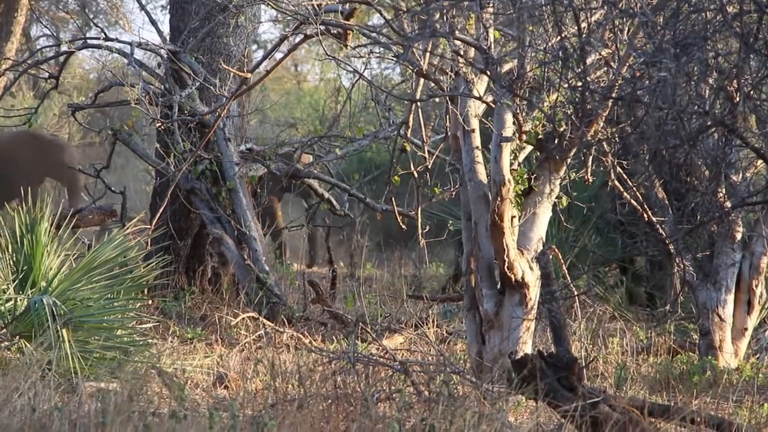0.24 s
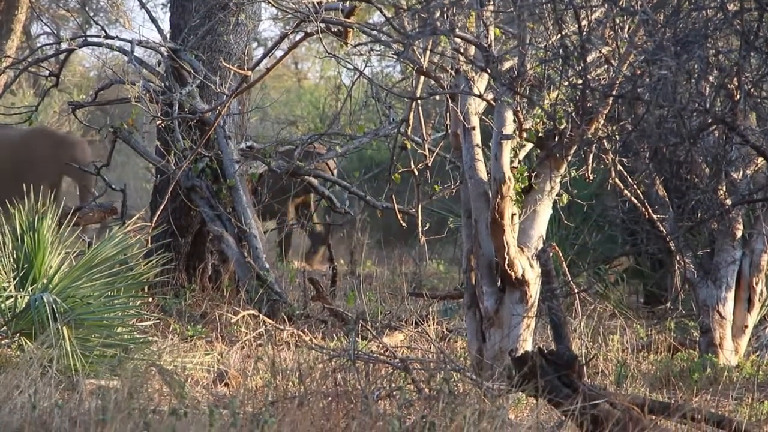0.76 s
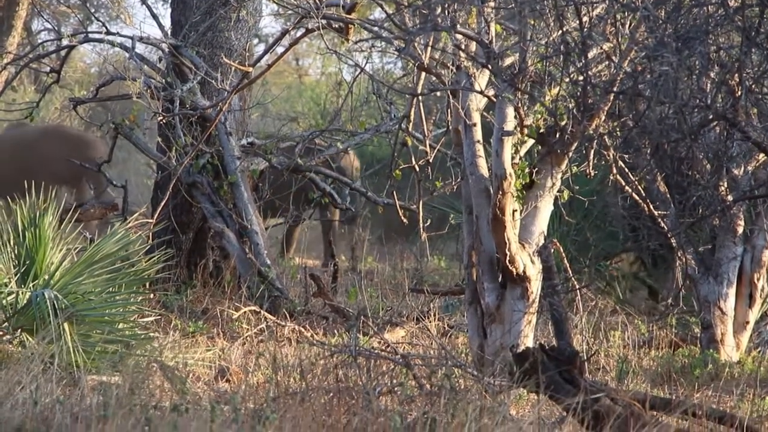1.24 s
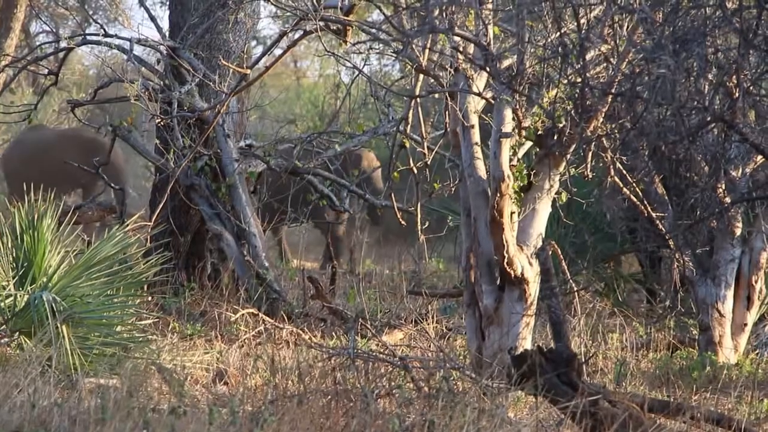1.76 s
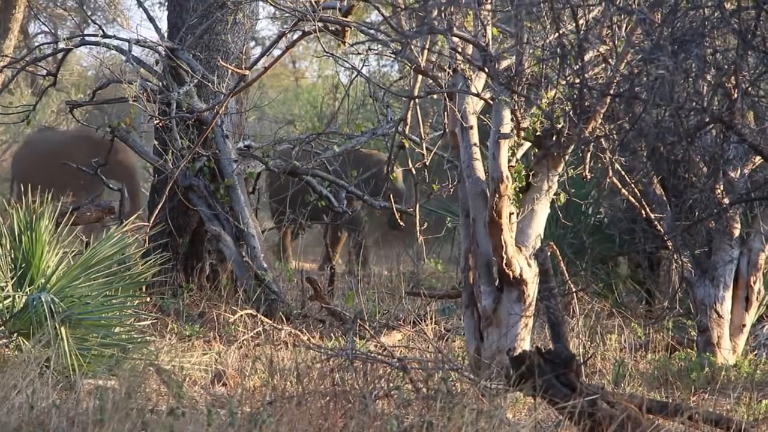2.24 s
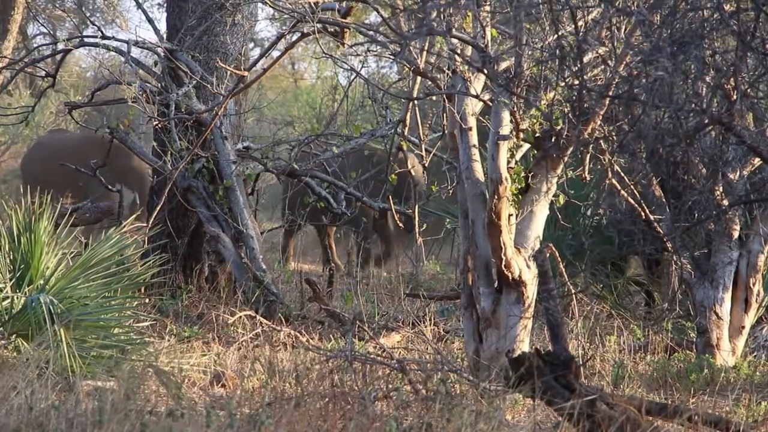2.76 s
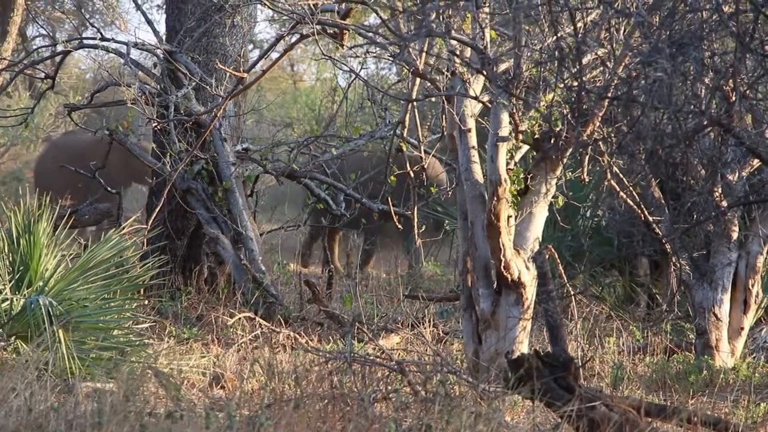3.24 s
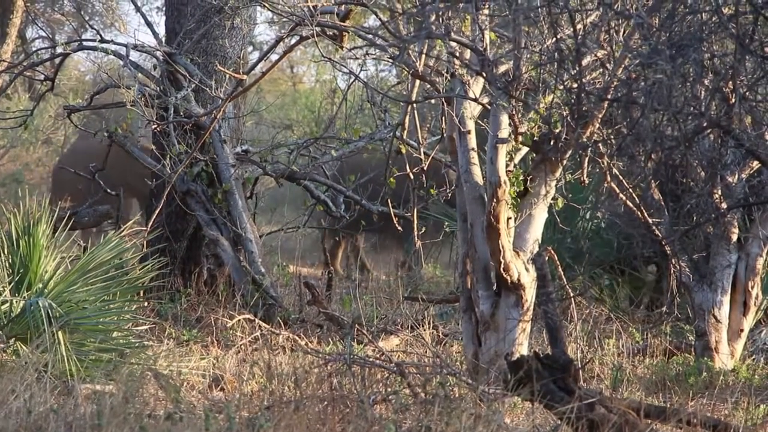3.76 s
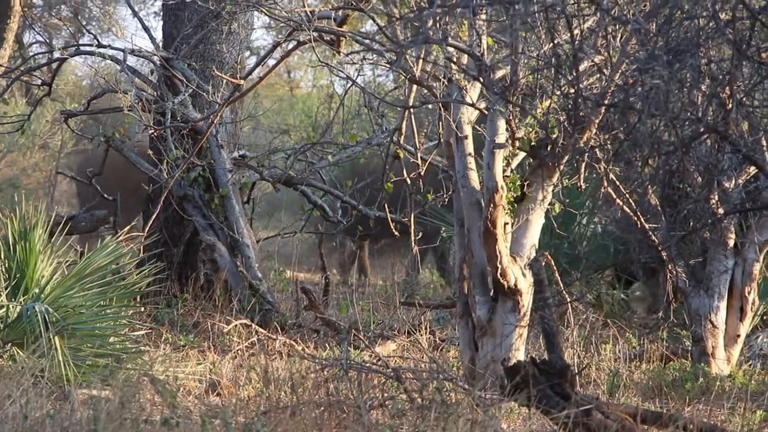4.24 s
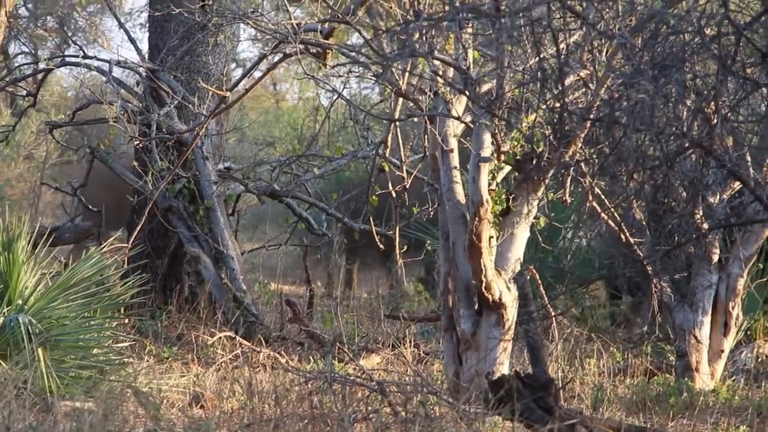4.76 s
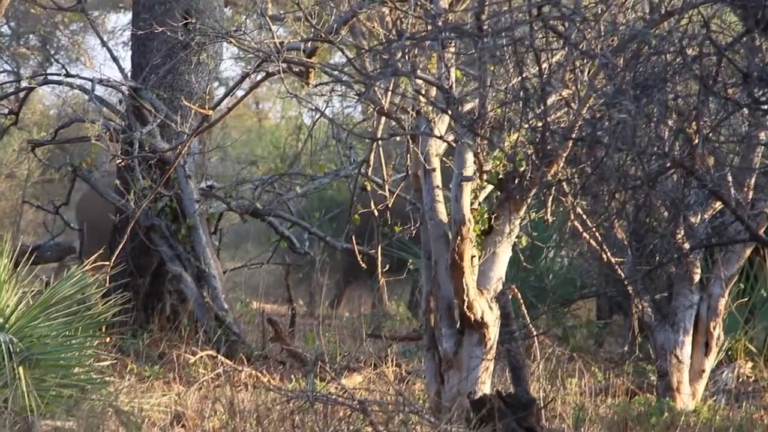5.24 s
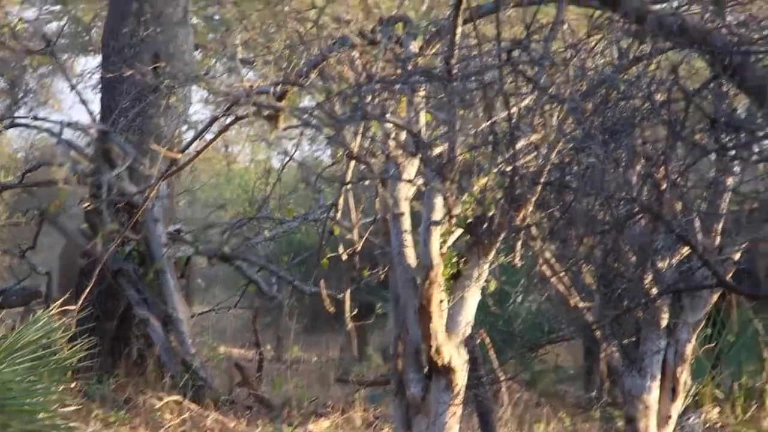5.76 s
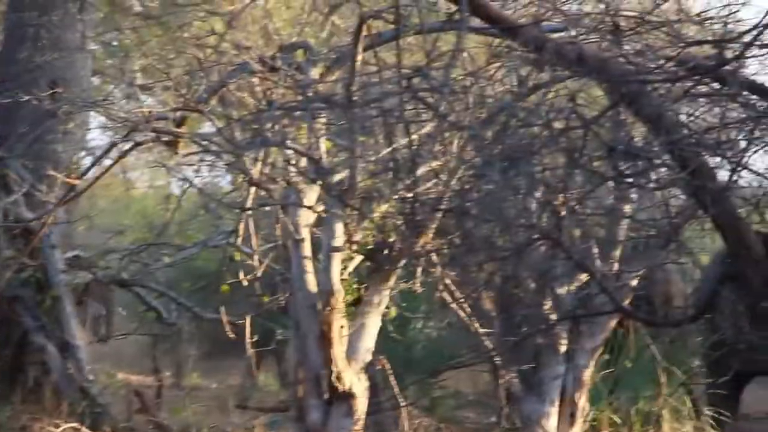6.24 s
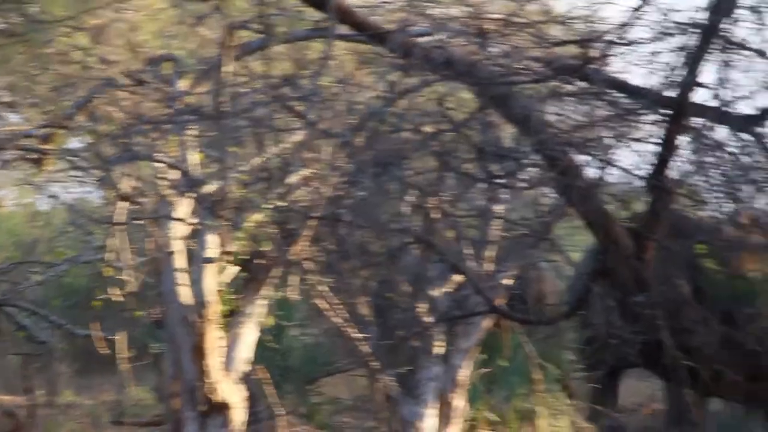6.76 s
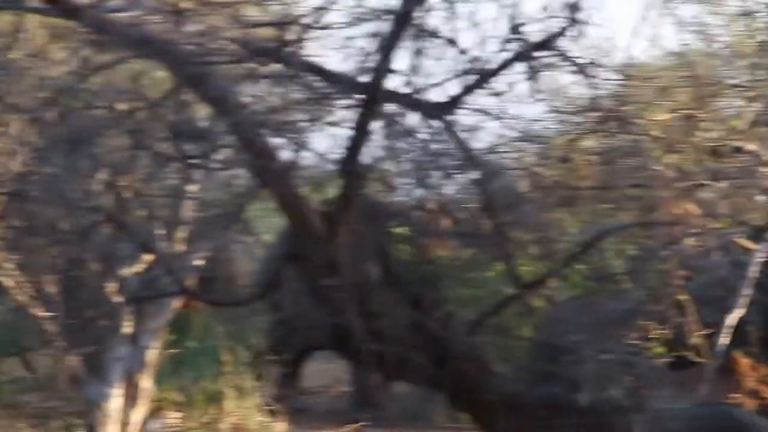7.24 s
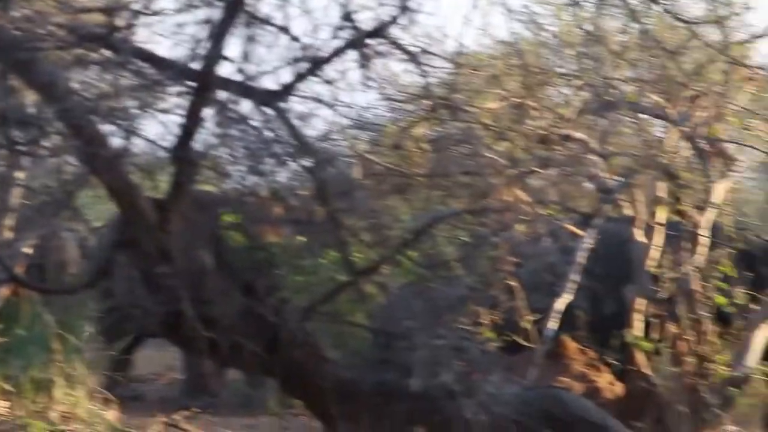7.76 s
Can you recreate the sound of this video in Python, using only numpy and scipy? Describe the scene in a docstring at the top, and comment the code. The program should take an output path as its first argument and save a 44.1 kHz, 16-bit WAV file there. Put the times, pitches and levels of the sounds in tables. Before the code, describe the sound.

A quiet outdoor bush scene, with low air, dry leaf rustle and a high, steady insect hiss. A near insect trills until about 1 second, then gives short buzzing chirps roughly every 0.4 seconds. Thin, high falling bird whistles come near 0.8, 2.8, 4.8 and 6.7. A branch swishes softly around 1.2, and a small crunch of wood breaks at 2.4. A far engine rises from about 2 seconds, swells again near 6.2, then drops away. Wood tears and cracks in a tight cluster at 3.6 to 3.7, snaps again at 4.1 with a swish, then at 5.1 and 5.4, where a short low bird note follows. Dull thuds land around 4.7 and 6.2 to 6.8. At 6.64 one huge, dry, close crack dwarfs everything, with a short woody scatter. A long faint trill resumes, with light twig ticks, rustling and a falling low whistle at 7.7.

```python
"""Dry bush with elephants browsing: wood cracks sharply, once loud and close, low thuds fall underfoot, and wood tears
in dense runs of grains. Filtered noise makes the low air, the rustling leaves and the swish of branches, while a far
vehicle drones on exhaust harmonics. An insect clicks in trills and chirps over a noisy chorus, and two kinds of bird
whistle falling notes. The trees scatter the wood and the birds back to a camera."""
import sys
import numpy as np
from scipy import signal
from scipy.fft import rfft, irfft, next_fast_len
from scipy.io import wavfile
from scipy.ndimage import uniform_filter1d, map_coordinates

SR = 44100
rng = np.random.default_rng(int(sys.argv[2]) if len(sys.argv) > 2 else 0)


def put_to_file(sound):
    """Save the sound as 16-bit audio at rate SR, in the file named by the first command-line argument."""
    columns = np.atleast_2d(sound).T  # one column per channel
    safe = np.clip(columns, -1, 1)
    whole_steps = np.round(safe * 32767)
    wavfile.write(sys.argv[1], SR, whole_steps.astype(np.int16))


N = 352830
TIME = np.arange(N) / SR
TOP_HZ = 16300  # the camera's band limit

# Swell of the far rumble. Each row: time in seconds, level in dB.
DRONE_LEVEL = [(0.0, -71), (0.4, -70.5), (0.89, -73.5), (2.2, -70.5), (2.45, -68), (4.14, -66),
               (4.86, -67.5), (6.42, -62.5), (7.17, -67.5), (8.0, -73.5)]
# Noise colour of the insects. Each row: frequency in Hz, relative density in dB per Hz.
INSECT_HISS = [(3000, -18), (6500, -14.5), (7300, -11), (8200, -4.5), (9100, -0.5), (10000, -4.5),
               (11000, -8), (11800, -13.5), (12600, -26.5), (15000, -32), (16000, -48.5)]


def amp(db):
    """Decibels to gain."""
    return np.exp(np.asarray(db) / 20 * np.log(10))


def unit(x):
    """Scales a signal to rms 1."""
    return x / np.sqrt(np.mean(x ** 2) + 1e-20)


def along(points, hz):
    """Reads (frequency, value) points on a log frequency axis."""
    f, v = np.transpose(points)
    return np.interp(np.log(hz + 1e-6), np.log(f), v)


def curves(rows, t=TIME):
    """Draws one curve over t for each column after the time."""
    s, *cols = np.transpose(rows)
    return [np.interp(t, s, c) for c in cols]


def wobble(rate, count=12):
    """A smooth random curve with rate knots a second, drawn in count steps per knot."""
    knots = rng.standard_normal(int(N * rate / SR) + 4)
    steps = np.arange(len(knots) * count) / count
    return np.interp(TIME * rate, steps, map_coordinates(knots, [steps]))


def add(track, s, sound):
    """Mixes a sound into a track at s seconds."""
    part = track[..., round(s * SR):][..., :sound.shape[-1]]
    part += sound[..., :part.shape[-1]]


def filtered(x, response):
    """Multiplies the spectrum of x by a response of frequency."""
    size = next_fast_len(N + SR // 4)
    spectrum = rfft(x, size) * response(np.fft.rfftfreq(size, 1 / SR))
    return irfft(spectrum, size)[..., :N]


def swell(t, peak, length, rise, edge_db):
    """Gain that climbs to 1 at the peak and falls back, edge_db down at both ends of its length."""
    rise = np.clip(rise, .05, .95)  # share of the length spent climbing
    distance = np.maximum((peak - t) / rise, (t - peak) / (1 - rise)) / length
    return amp(edge_db * distance)


def spread(count, apart):
    """Two rows of noise: a part shared by both ears, and a private part scaled by apart."""
    shared = rng.standard_normal(count)
    return shared + apart * rng.standard_normal((2, count))


def rush(spectrum, patchy_db):
    """Stereo noise of rms 1, with patches of random gain in time and frequency."""
    # How alike the two sides are. Each row: frequency in Hz, left-right correlation from -1 to 1.
    likeness = [(60, 0.206), (120, 0.59), (240, 0.39), (480, 0.19), (950, 0.079), (1890, -0.014),
                (3770, 0.098), (7520, 0.24), (15000, -0.24)]
    z = signal.stft(rng.standard_normal((2, N)), nperseg=512)[2]
    field = uniform_filter1d(rng.standard_normal(z.shape[1:]), size=6, axis=0)
    field = uniform_filter1d(field, size=14, axis=1)
    pair = signal.istft(z * amp(patchy_db * unit(field)))[1][:, :N]

    def mid_side(hz):
        """Colours the pair and splits its power between mid and side."""
        turn = np.arccos(np.clip(along(likeness, hz), -1, 1)) / 2
        return amp(along(spectrum, hz)) * [np.cos(turn), np.sin(turn)]

    mid, side = filtered(pair, mid_side)
    return unit(np.array([mid + side, mid - side]))


def murmur(low_db=-64, low_follows=0.55, brush_db=-63, brush_follows=0.44):
    """Low air and a soft wash through the brush: noise that swells with the far drone."""
    # Colour of the low air. Each row: frequency in Hz, relative density in dB per Hz.
    low_colour = [(15, -27), (40, -6), (80, -5), (170, -0.5), (230, -2.5), (300, -8), (420, -19),
                  (900, -58.5)]
    # Colour of the brush. Each row: frequency in Hz, relative density in dB per Hz.
    brush_colour = [(150, -13.5), (350, -1.5), (560, -1), (1000, -4.5), (1500, -10), (2200, -15),
                    (4500, -47)]
    drone_db, = curves(DRONE_LEVEL)
    swell_db = drone_db - drone_db.mean()
    low_gain = amp(low_db + low_follows * swell_db + 0.77 * wobble(11.0))
    brush_gain = amp(brush_db + brush_follows * swell_db + 0.18 * wobble(10))
    return low_gain * rush(low_colour, patchy_db=1.04) + brush_gain * rush(brush_colour, patchy_db=2.1)


def vehicle(count=13, coasting_db=-22, exhaust_db_per_octave=6, whine_db_per_octave=9):
    """A far engine pulls twice: exhaust harmonics sound while it gains speed, a geared whine grows with speed."""
    # Speed of the engine. Each row: time in seconds, firing rate in Hz.
    engine_speed = [(2.1, 31), (2.85, 44), (3.3, 49), (4.3, 50.3), (4.9, 49), (5.4, 52.5), (6.2, 60.3),
                    (6.55, 59.5), (7.6, 41)]
    # Response of the exhaust pipe. Each row: frequency in Hz, gain in dB.
    pipe = [(55, -10.5), (80, -7), (118, 3.5), (170, -17), (260, -12), (400, -17), (460, -2.5),
            (540, -19.5)]
    cruise_hz, full_throttle_hz_per_s, throttle_lag_s = 50, 10, .3
    exhaust_db, whine_db = -.5, -3.5
    gear_ratio, unsteady = 10 / 3, .005
    hz, = curves(engine_speed)
    drone_db, = curves(DRONE_LEVEL)
    gaining = uniform_filter1d(np.gradient(hz) * SR, size=int(throttle_lag_s * SR))
    throttle = np.clip(gaining / full_throttle_hz_per_s, 0, 1)
    octaves = np.log2(hz / cruise_hz)
    phase = 2 * np.pi * np.cumsum(hz * (1 + unsteady * wobble(14))) / SR
    exhaust = unit(sum(amp(along(pipe, k * hz)) * np.sin(k * phase) for k in range(1, count + 1)))
    throttle_db = coasting_db * (1 - throttle)
    exhaust *= amp(exhaust_db + throttle_db + exhaust_db_per_octave * octaves + 1.8 * wobble(3.9))
    whine = unit(np.sin(gear_ratio * phase))
    whine *= amp(whine_db + whine_db_per_octave * octaves + 1.97 * wobble(6.5))
    return amp(drone_db) * (exhaust + whine)


def undergrowth(crackle_db=-16, edge_db=-15, grit_db=-9, order=10):
    """Dry leaves: a noise rustle with tiny random crackles, and swells of noise where a branch is pushed aside."""
    # Colour of the rustle. Each row: frequency in Hz, relative density in dB per Hz.
    rustle_colour = [(700, -13), (1500, 0), (2300, 1.5), (4200, -1), (6000, -7.5), (9000, -23),
                     (13000, -43.5)]
    # Level of the rustle. Each row: time in seconds, level in dB.
    rustle_level = [(0, -66), (5, -64.5), (5.7, -68), (6.5, -67), (7, -64.5), (8, -65)]
    # Colour of a swishing branch. Each row: frequency in Hz, relative density in dB per Hz.
    swish_colour = [(500, -5), (1500, -6.5), (2500, -1), (3400, -5.5), (4200, -1), (6000, -5.5),
                    (9000, -16), (13000, -40)]
    # Branches pushed aside. Each row: peak in seconds, length in seconds, level at the peak in dB before
    # muffling, frequency in Hz above which the bush muffles it.
    swishes = [(.35, 0.44, -63.5, 4500), (0.758, 0.05, -62, 6000), (1.164, 0.64, -60, 8000),
               (4.136, 0.18, -54, 9000), (4.373, 0.55, -61.5, 4400), (4.583, 0.23, -57.5, 4440),
               (5.02, 0.36, -62.5, 6500), (7.118, 0.21, -57.5, 4700), (7.713, 0.57, -60.5, 4530),
               (7.956, 0.15, -57.5, 4600)]
    swish_rise = 0.38  # share of a swish spent building up
    crackle_rate, crackle_band_hz = 220, (2300, 4800)  # crackles a second
    ticks = (rng.random(N) < crackle_rate / SR) * spread(N, apart=0.29)
    crackle = unit(signal.lfilter(*signal.butter(2, crackle_band_hz, "bandpass", fs=SR), ticks))
    rustle_db, = curves(rustle_level)
    rustle = rush(rustle_colour, patchy_db=2.0) + amp(crackle_db) * crackle
    out = amp(rustle_db + 0.4 * wobble(6)) * rustle
    leaves = rush(swish_colour, patchy_db=1.0) + amp(grit_db) * crackle
    for peak, length, db, muffle_hz in swishes:
        muffle = signal.butter(order, min(muffle_hz, TOP_HZ), fs=SR, output="sos")
        muffled = signal.sosfilt(muffle, leaves)
        out += amp(db) * swell(TIME, peak, length, swish_rise, edge_db) * muffled
    return out


def phrasing(phrases, fade_s):
    """Effort of the insect's phrases, and the progress through each from -.5 to .5."""
    effort, progress = np.zeros(N), np.zeros(N)
    for start, length, db in phrases:
        from_middle = TIME - start - length / 2
        gate = np.clip((length / 2 - np.abs(from_middle)) / fade_s + .5, 0, 1)
        effort += amp(db) * gate
        progress = np.where(gate > 0, from_middle / length, progress)
    return effort, progress


def buzz(phrases, rate_hz, sag, tone_db, body_db, fade_s):
    """Click harmonics slide down the body's resonances as the rate sags, and rasping noise pulses with the clicks."""
    # Resonances of the insect's body. Each row: frequency in Hz, gain in dB.
    body = [(7200, -20), (7570, -11), (7660, -12), (7740, 0), (7870, -14), (8020, -5), (8240, 1),
            (8330, -5), (8410, -3), (8510, -4), (8620, -8), (8770, 3), (8900, -4), (9020, -5), (9150, 1),
            (9400, -9), (9530, -5), (9640, -10), (9760, -4), (10000, -13), (10180, -6), (10500, -18),
            (10850, -10), (11500, -26)]
    rasp_db, rasp_depth = -12, .9
    jitter, flutter_db, scatter_rad = .0013, 3, 1.0
    easing = .8  # the rate sags fastest at first
    effort, progress = phrasing(phrases, fade_s)
    rate = rate_hz * (1 - sag * (progress - easing * progress ** 2) + jitter * wobble(120))
    phase = 2 * np.pi * np.cumsum(rate) / SR
    tone = np.zeros(N)
    for k in range(int(body[0][0] / rate_hz), int(body[-1][0] / rate_hz)):
        gain = amp(along(body, k * rate) + flutter_db * wobble(25))
        tone += gain * np.sin(k * phase + scatter_rad * wobble(40))
    rasp = amp(rasp_db) * rush(INSECT_HISS, patchy_db=1.5) + amp(body_db) * rush(body, patchy_db=0.5)
    pulsing = np.sqrt(1 + rasp_depth * np.cos(phase))
    return effort * (amp(tone_db) * unit(tone) + pulsing * rasp) * amp([[.3], [-.3]])


def insects(chorus_db=-59.0, fade_s=.062):
    """One near insect clicks some 300 times a second in trills and chirps, over a steady far chorus of noise."""
    # Long trills. Each row: start in seconds, length in seconds, level in dB.
    trill_phrases = [(-.3, 0.64, -59.5), (.43, 0.62, -59), (6.691, 1.3, -62.5)]
    # Short chirps. Each row: start in seconds, length in seconds, level in dB.
    chirp_phrases = [(1.235, 0.301, -59), (1.65, 0.32, -62.5), (2.05, 0.3, -61), (2.44, 0.3151, -60),
                     (2.87, 0.35, -60), (3.29, 0.33, -61), (3.7, .28, -59), (4.12, .31, -58),
                     (4.55, 0.33, -59.5), (4.98, 0.27, -62), (5.41, 0.25, -60), (5.87, 0.37, -62),
                     (6.36, 0.29, -62.5)]
    trills = buzz(trill_phrases, rate_hz=316.5, sag=.009, tone_db=-3.5, body_db=-14, fade_s=fade_s)
    chirps = buzz(chirp_phrases, rate_hz=325.5, sag=.036, tone_db=-5, body_db=-6, fade_s=fade_s)
    return trills + chirps + amp(chorus_db) * rush(INSECT_HISS, patchy_db=1.5)


def bird(note, calls, waver, flutter_db):
    """A falling sine whistle with a slight waver and flutter; short calls break off partway down the fall."""
    out = np.zeros((2, N))
    waver_rate, release_s = 220, .012
    unsteady, flutter = 1 + waver * wobble(waver_rate), flutter_db * wobble(70)
    for start, db, speed, pitch, length in calls:
        now = (TIME > start) & (TIME < start + length)
        t = TIME[now] - start
        hz, level = curves(note, t * speed)
        release = np.minimum((length - t) / release_s, 1)
        phase = 2 * np.pi * np.cumsum(pitch * hz * unsteady[now]) / SR
        out[:, now] += release * amp(db + level + flutter[now]) * np.sin(phase)
    return out


def birds():
    """Two kinds of bird, one thin and high, one low."""
    # The thin note at speed 1. Each row: time from its start in seconds, frequency in Hz, relative level in dB.
    thin_note = [(0, 7800, -9), (.025, 7560, -2), (.06, 7280, 0), (.11, 7020, 0), (.17, 6880, -4),
                 (.22, 6680, -2), (.27, 6590, -4), (.3, 6520, -18)]
    # The low note at speed 1. Each row: time from its start in seconds, frequency in Hz, relative level in dB.
    low_note = [(0, 2100, -27), (.02, 2095, -9), (.037, 2060, 0), (.046, 1900, -1), (.061, 1520, -6),
                (.083, 1250, -15), (.1, 1130, -13), (.115, 900, -17), (.13, 860, -22)]
    # Thin calls. Each row: start in seconds, level in dB, speed factor, pitch factor, length in seconds.
    thin_calls = [(.81, -66, .95, 1, .315), (2.77, -65.5, 1, .995, .3), (4.79, -68.5, 1, 1, .3),
                  (6.65, -66.5, 1, 1, .3)]
    # Low calls. Each row: start in seconds, level in dB, speed factor, pitch factor, length in seconds.
    low_calls = [(0.11, -64, 1.1, 0.56, .058), (.232, -63.5, 1, 0.5, .06), (1.938, -66, 1.2, 1, .045),
                 (5.432, -48.5, 1, 1.02, .085), (7.66, -45.5, 1, 1, .135)]
    thin = bird(thin_note, thin_calls, waver=.005, flutter_db=3)
    return thin + bird(low_note, low_calls, waver=.008, flutter_db=2)


def grounded(x):
    """A bounce off the ground beats against a gliding whistle and breaks it into steps."""
    echo_s, echo_db = .0029, -10
    out = x.copy()
    add(out, echo_s, amp(echo_db) * x)
    return out


def blurred(x):
    """Smears a clean tone into a narrow band of noise by random modulation."""
    return x * unit(wobble(260))


def trees(x):
    """Trunks and leaves scatter a diffuse noise tail, each frequency dying at its own speed."""
    # Decay among the trees. Each row: frequency in Hz, time to fall 60 dB in seconds.
    bush_decay = [(200, .8), (900, 2.5), (2000, 1.33), (3500, 0.65), (9000, 0.5)]
    hz, t, z = signal.stft(rng.standard_normal((2, SR)), SR, nperseg=256)
    tail = signal.istft(z * amp(-60 * t / along(bush_decay, hz)[:, None]), SR)[1]
    return signal.fftconvolve(x, tail / np.linalg.norm(tail[0]), axes=1)[:, :N]


def stalks(t60=0.011):
    """Each thin stalk ticks as one short, high, decaying sine."""
    # Stalks ticking. Each row: start in seconds, starting level in dB, pitch in Hz.
    stalk_ticks = [(4.396, -48, 4050), (7.566, -51, 3773), (7.633, -50, 4100), (7.654, -46, 3800),
                   (7.681, -50, 3750), (7.942, -51, 4150)]
    out, t = np.zeros((2, N)), np.arange(SR // 20) / SR
    for s, db, pitch_hz in stalk_ticks:
        add(out, s, amp(db - 60 * t / t60) * np.sin(2 * np.pi * pitch_hz * t))
    return out


def pulse_of(spectrum, pitch_hz, size=2048):
    """The causal pressure pulse of one crack, thud or grain, peak 1, its spectrum scaled to the pitch."""
    ratio = np.fft.rfftfreq(size, 1 / SR) / pitch_hz
    # folding the cepstrum packs the energy to the front of the pulse
    cepstrum = irfft(np.log(amp(along(spectrum, ratio))))
    cepstrum[1:size // 2] *= 2
    cepstrum[size // 2 + 1:] = 0
    dispersion = (1 - 1j * ratio) / (1 + 1j * ratio)  # bending waves carry the treble out first
    pulse = irfft(np.exp(rfft(cepstrum)) * dispersion)
    return pulse[None] / np.abs(pulse).max()


def bursts(scatter_db=1.5, edge_db=-18):
    """Bursts of tearing wood and low thuds underfoot: grains of sound in a dense uneven run that swells and falls."""
    # Colour of one grain. Each row: multiple of its pitch, gain in dB.
    grain_colour = [(.1, -36), (.25, -20.5), (.38, -8.5), (.55, -13), (.66, -11), (.86, -2), (1.1, 3),
                    (1.22, -13), (1.5, -2.5), (1.85, -17), (3, -25), (5, -58)]
    # Bursts and thuds. Each row: peak in seconds, length in seconds, level at the peak in dB, pitch in Hz.
    burst_rows = [(1.139, 0.25, -59, 4800), (1.547, 0.08, -62, 597), (2.368, 0.052, -54, 1200),
                  (2.385, 0.13, -60.5, 2880), (2.398, 0.033, -52, 1100), (3.585, 0.077, -61.5, 2000),
                  (3.645, 0.067, -39.5, 2010), (3.699, 0.025, -50.5, 1800), (3.719, .03, -48, 1630),
                  (3.732, 0.016, -49.5, 780), (4.128, 0.086, -58, 1546), (4.698, 0.035, -55, 184),
                  (5.981, 0.043, -58.5, 890), (6.176, 0.043, -51.5, 183), (6.402, 0.053, -55, 610),
                  (6.402, 0.0392, -47, 175), (6.552, .045, -54, 180), (6.785, .035, -51, 172)]
    burst_rise = .64  # share of a burst spent building up
    grain_rate = 3500  # grains a second
    out = np.zeros((2, N))
    for peak, length, db, pitch_hz in burst_rows:
        t = peak - burst_rise * length + np.arange(0, length, 1 / SR)
        grains = (rng.random(len(t)) < grain_rate / SR) * rng.choice([-1, 1], len(t))
        grains = grains * amp(scatter_db * spread(len(t), apart=1.0))
        run = unit(signal.fftconvolve(grains, pulse_of(grain_colour, pitch_hz))[:, :len(t)])
        add(out, t[0], run * amp(db) * swell(t, peak, length, burst_rise, edge_db))
    return out * amp([[.8], [-.8]])


def cracks_and_thuds(splinter_t60=0.019, ground_s=0.001034, ground_db=-17, order=4):
    """Each row gives one crack or thud, its bounce off the ground, a spray of splinters and a faint ring."""
    # Sharp cracks of wood and low thuds; some snaps and tears take several rows. Each row: time in seconds,
    # level in dB, pitch in Hz, splinter level in dB against the first impulse, left minus right in dB,
    # frequency in Hz above which leaves muffle it.
    impacts = [(2.368, -45.5, 696.3, 5, 5, 5000), (2.392, -45, 998, 6.5, 1, 5000),
               (2.405, -43.5, 790, -4, 5, 4000), (3.628, -43, 1900, -6, -3.5, 4000),
               (3.6362, -37, 2200, -3, 8, 4500), (3.644, -34, 1960, 4, 6, 5500),
               (3.6572, -33.5, 1600, 3, 1, 4000), (3.688, -46, 1900, 0, 2, 4000),
               (3.717, -47, 1350, 0, 3, 3200), (3.7245, -43, 810, 5, -3, 2500),
               (4.125, -38, 1560, 0, 5, 3000), (4.1304, -32.5, 1500, 2.5, 5, 3800),
               (4.1332, -33.5, 1420, -5, 7, 2500), (4.692, -50.5, 260, 4, 3, 3000),
               (5.0912, -35, 1150, -9, 3, 2770), (5.093, -35.5, 950, -7, 1, 2220),
               (5.372, -35, 2550, 7, 2, 14150), (5.373, -47, 900, 7, 0, 3000),
               (6.009, -46, 785, -3, 3, 5000), (6.39, -44.5, 328, -10, 0, 4000),
               (6.539, -49, 262, 2, 0, 4000), (6.6426, -5.5, 1375, -8, -1.5, 16000),
               (6.6466, -29.5, 910, 4, 7, 4500), (6.775, -47, 303, -1, 5, 5000),
               (6.976, -50, 4215, 14, -1.5, 5980), (7.054, -50, 900, 0, 2, 3970),
               (7.344, -55, 585, 0, 4, 2500), (7.473, -51, 1093, 5.5, 5, 4024)]
    # Colour of one crack or thud. Each row: multiple of its pitch, gain in dB.
    impact_colour = [(.05, -50), (.25, -25), (.48, -12.5), (.6, -1), (.75, 0.5), (.92, -3.5), (1.2, 2),
                     (1.5, -4), (1.75, -11.5), (2.3, -8.5), (2.9, -13.5), (3.5, -18), (4.4, -32),
                     (5.2, -21), (6.2, -39), (11, -42)]
    # What rings on after it. Each row: frequency in Hz, level in dB against the row's own level, time to
    # fall 60 dB in seconds.
    ring_modes = [(440, -58, 0.38), (608, -45, 0.13), (783, -49.5, 0.29), (990, -55, 1.24),
                  (1125, -45, 0.13), (1290, -36, 0.074), (1669, -55.5, 0.53), (3009, -67, 0.35)]
    ear_lag_s = .000024
    out, t = np.zeros((2, N)), np.arange(SR // 2) / SR
    ring = sum(amp(level - 60 * t / t60) * np.sin(2 * np.pi * hz * t) for hz, level, t60 in ring_modes)
    for s, db, pitch_hz, splinter_db, pan_db, muffle_hz in impacts:
        force = spread(len(t), apart=1.0) * amp(-60 * t / splinter_t60)
        force *= amp(splinter_db) / np.linalg.norm(force[0])
        force[:, 0] += 1  # the first impulse
        force[:, round(ground_s * SR)] += amp(ground_db)
        impact = signal.fftconvolve(force, pulse_of(impact_colour, pitch_hz))[:, :len(t)]
        impact = signal.lfilter(*signal.butter(order, min(muffle_hz, TOP_HZ), fs=SR), impact)
        for ear, side in enumerate((1, -1)):  # the nearer ear hears it louder and sooner
            arrival = s - side * np.tanh(pan_db) * ear_lag_s
            add(out[ear], arrival, amp(db + side * pan_db / 2) * (impact[ear] + ring))
    return out


def scene():
    """The near sounds are almost dry; the birds call from deep among the trees, with a blurred echo."""
    near, calls = cracks_and_thuds() + bursts() + stalks(), birds()
    scattered = trees(amp(-35) * near + amp(-6.5) * blurred(calls))
    background = murmur() + vehicle() + undergrowth() + insects()
    return background + grounded(calls) + scattered + near


def record(dry):
    """The camera rounds off the loudest peak and keeps nothing above its band limit."""
    ceiling, hardness = .4, 8
    held = dry / (1 + np.abs(dry / ceiling) ** hardness) ** (1 / hardness)
    return filtered(held, lambda hz: hz < TOP_HZ)


dry = scene()
out = record(dry)
put_to_file(out)
```